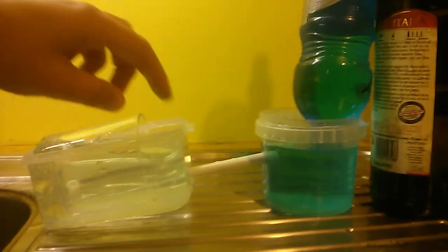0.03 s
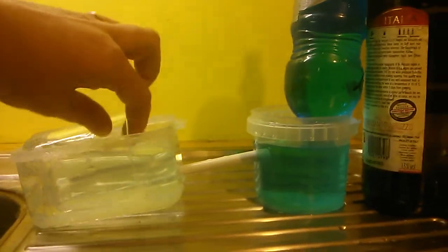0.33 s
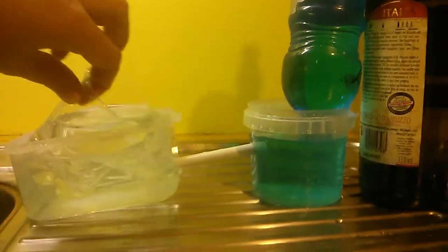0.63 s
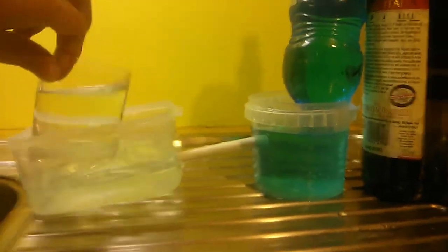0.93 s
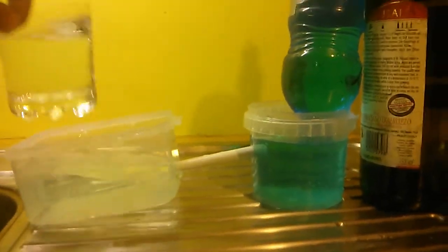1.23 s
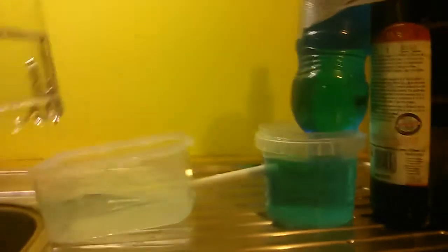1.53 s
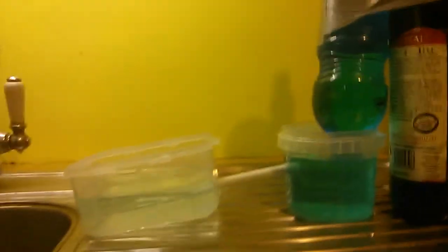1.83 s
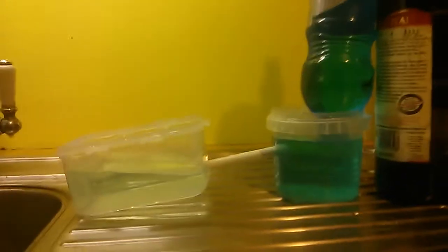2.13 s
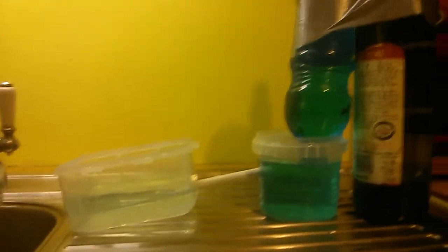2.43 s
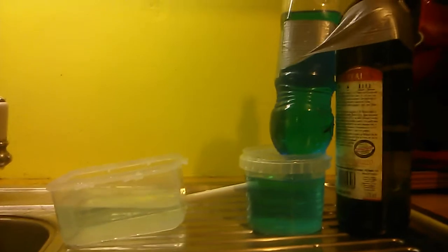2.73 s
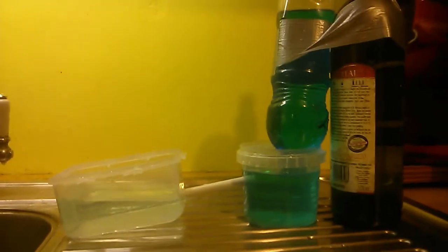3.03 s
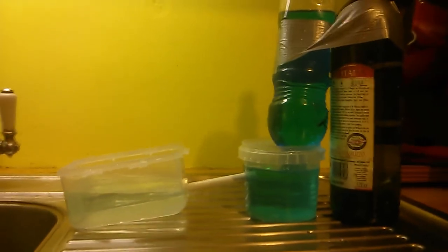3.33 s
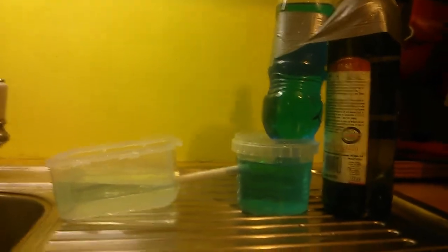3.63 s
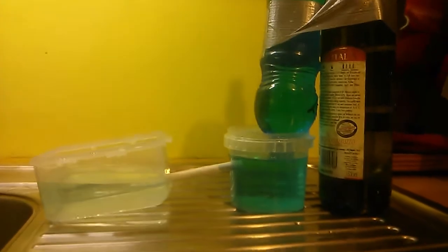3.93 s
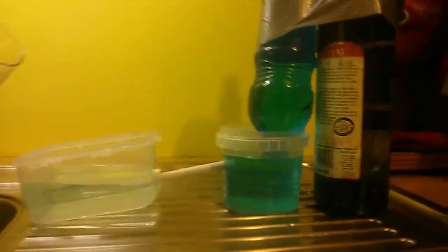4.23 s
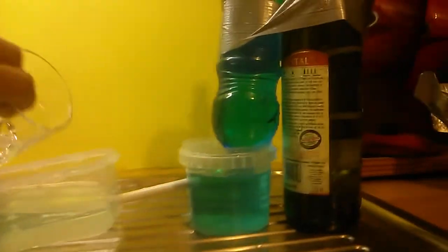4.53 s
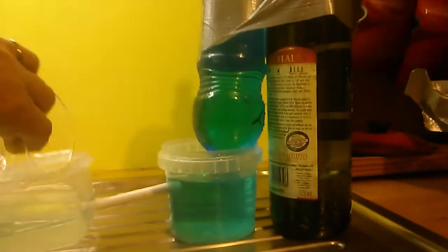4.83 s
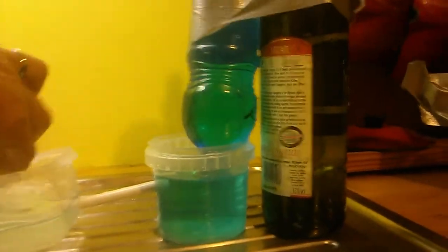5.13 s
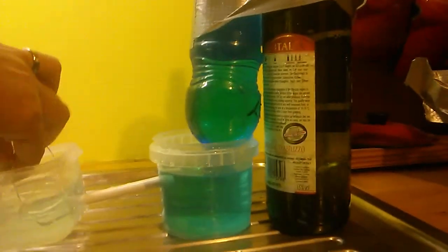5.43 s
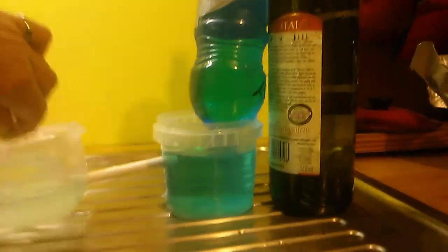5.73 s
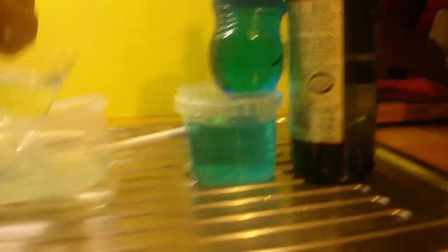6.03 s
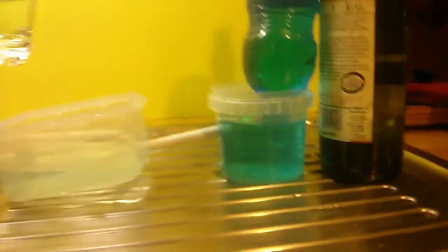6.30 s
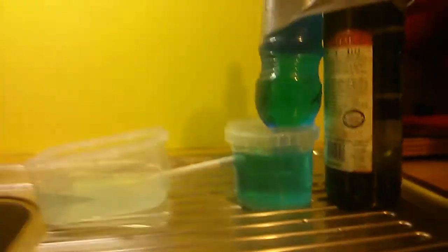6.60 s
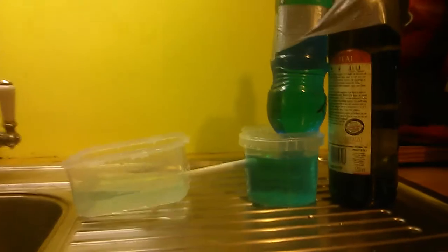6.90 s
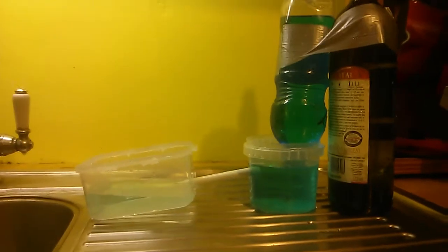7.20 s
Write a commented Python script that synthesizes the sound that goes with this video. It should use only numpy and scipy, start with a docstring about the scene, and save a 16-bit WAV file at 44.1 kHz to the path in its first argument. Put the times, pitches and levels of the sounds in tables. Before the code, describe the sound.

A cup knocks out of a plastic tub of water, is emptied splashing into a steel sink, then dipped again with gulps.

```python
"""A clear cup knocks against a plastic tub of water as it is lifted out; the steel draining board
booms under each knock. From 2.5 s it is emptied to one side: slaps on steel, three gushes of spray,
a gurgle, a trickle. Near 5 s it comes back, knocks against the tub, gulps as it is pushed under
(air pockets ring) and is lifted out again, dripping. Throughout, a small hard-walled kitchen
with a faint hum rings on."""
import sys
import numpy as np
from scipy import signal
from scipy.fft import rfft, irfft, next_fast_len
from scipy.io import wavfile
from scipy.ndimage import uniform_filter1d, map_coordinates

SR = 44100
rng = np.random.default_rng(int(sys.argv[2]) if len(sys.argv) > 2 else 0)


def to_wav(s):
    """Save 16-bit WAV."""
    ch = np.atleast_2d(s).T  # columns
    pcm = np.round(np.clip(ch, -1, 1) * 32767)  # PCM
    wavfile.write(sys.argv[1], SR, pcm.astype(np.int16))


N = 320166
TOP_HZ = 16000
T = np.arange(SR // 2) / SR  # time axis of one event, s


def amp(db):
    """Decibels to gain."""
    return 10 ** (np.asarray(db) / 20)


def unit(x):
    """x at rms 1."""
    return x / np.sqrt(np.mean(x ** 2) + 1e-20)


def crest(x):
    """x with its loudest 4 ms at rms 1."""
    return x / np.sqrt(uniform_filter1d(x ** 2, size=176).max() + 1e-20)


def fade(t, t60_s):
    """Exponential decay, 60 dB in t60_s."""
    return np.exp(-np.log(1000) * t / t60_s)


def punch(boost, t60_s):
    """Gain that lifts a contact's first instant above its ring."""
    return 1 + boost * fade(T, t60_s)


def along(points, hz):
    """Interpolate (Hz, value) points on a log axis."""
    knots_hz, values = np.transpose(points)
    return np.interp(np.log(hz + 1), np.log(knots_hz + 1), values)


def curve(points):
    """Gain per sample from (s, dB) points, silent outside them."""
    times_s, db = np.transpose(points)
    return amp(np.interp(np.arange(N) / SR, times_s, db, left=-120, right=-120))


def wobble(knots_per_s):
    """Smooth random curve."""
    knots = rng.standard_normal(int(N * knots_per_s / SR) + 4)
    return map_coordinates(knots, [np.arange(N) * knots_per_s / SR])


def filtered(x, response):
    """x times a gain over frequency."""
    size = next_fast_len(len(x) + 8192)
    return irfft(rfft(x, size) * response(np.fft.rfftfreq(size, 1 / SR)), size)[:len(x)]


def noise(response, size):
    """Coloured noise at rms 1."""
    return unit(filtered(rng.standard_normal(size), response))


def hump(centre_hz, octaves):
    """Response of a resonance with soft skirts."""
    return lambda hz: (1 + (np.log2((hz + 1) / centre_hz) / octaves) ** 2 / 4) ** -3.5


def burst(centre_hz, octaves, t60_s, swell_s):
    """Short spit of noise round one pitch."""
    band = noise(hump(centre_hz, octaves), len(T))
    return crest(band * fade(T, t60_s) * (1 - np.exp(-T / swell_s)))


def add(track, start_s, sound):
    """Mix a sound into the track."""
    i = max(0, round(start_s * SR))
    track[i:i + len(sound)] += sound[:max(0, N - i)]


def kitchen_tail():
    """Diffuse impulse response; each frequency dies at its own speed."""
    # Each row: frequency in Hz, t60 in seconds.
    decay = [(100, 0.43), (500, 0.5), (2000, 0.42), (7000, 0.47), (15000, 0.45)]
    hz, t, spectra = signal.stft(rng.standard_normal(SR), SR, nperseg=256)
    tail = signal.istft(spectra * fade(t, along(decay, hz)[:, None]), SR, nperseg=256)[1]
    tail *= 1 - np.exp(-np.arange(len(tail)) / SR / 0.0084)
    return tail / np.linalg.norm(tail)


def room(x):
    """x as the kitchen returns it."""
    return signal.fftconvolve(x, kitchen_tail())[:N]


def wash(click, colour):
    """A click radiates differently each way, so its echo keeps only its energy and broad colour."""
    echo = filtered(kitchen_tail(), colour)
    return echo * np.linalg.norm(click) / np.linalg.norm(echo)


def background():
    """Still air, a faint wavering hum and a thin hiss that comes and goes."""
    # Each row: frequency in Hz, relative spectral density in dB.
    air_spectrum = [(25, -17), (60, -10), (110, -6), (220, -1), (330, -3.5), (510, -11.5), (650, -2.5),
                    (850, -19), (1020, -13.5), (1300, -21.5), (2000, -19.5), (3200, -40.5), (7500, -37),
                    (16000, -48.5)]
    hiss_spectrum = [(3000, -9), (5000, -9), (7800, -4), (11000, -9), (14000, -4), (16000, -5.5)]
    # Each row: centre in Hz, half-width in Hz, relative level in dB.
    hum_bands = [(118.4, 1.3, -68), (219.4, 11, -63), (385, 74, -63.5), (702, 35, -68), (900, 45, -66.5),
                 (1325, 77, -71)]
    # Each row: time in seconds, level in dB.
    hiss_levels = [(0, -68), (1.2, -74.5), (1.7, -70), (2.4, -69), (3.9, -65), (4.7, -67), (5.6, -63.5),
                   (6.2, -73), (7.26, -73.5)]
    hum = sum(amp(db) * noise(lambda f: 1 / (1 + ((f - hz) / width_hz) ** 2), N)
              for hz, width_hz, db in hum_bands)
    hiss = curve(hiss_levels) * noise(lambda hz: amp(along(hiss_spectrum, hz)), N)
    air = noise(lambda hz: amp(along(air_spectrum, hz)), N)
    return amp(-55.5) * air + amp(-1) * hum + hiss


def hisses():
    """Brief soft hisses, heard mostly through the room."""
    # Each row: start in seconds, peak in dB, t60 in seconds.
    puffs = [(0, -51, 0.2), (2.251, -62.5, 0.099), (2.459, -51.5, 0.099), (3.519, -57.5, 1),
             (4.822, -49, 0.22), (5.078, -47, 0.33), (6.647, -49, 0.042), (7.11, -54, 0.11),
             (7.214, -52.5, 0.093)]
    centre_hz, octaves = 8240, 0.52
    out = np.zeros(N)
    for start_s, db, t60_s in puffs:
        puff = amp(db) * burst(centre_hz, octaves, t60_s, swell_s=0.0012)
        add(out, start_s, puff)
        add(out, start_s, amp(1.5) * wash(puff, hump(centre_hz, octaves)))
    return out


def clinks():
    """A light touch on something hard rings with two narrow partials."""
    # Each row: start in seconds, peak in dB, lower partial in Hz.
    touches = [(1.990, -60, 3280), (7.219, -52, 3730)]
    out = np.zeros(N)
    for start_s, db, hz in touches:
        for ratio, partial_db in ((1, 0), (1.75, -5.5)):
            partial = burst(hz * ratio, octaves=0.081, t60_s=0.065, swell_s=0.001)
            add(out, start_s, amp(db + partial_db) * partial)
    return out + amp(-2) * room(out)


def bumps():
    """Soft, dull contacts, single or in loose runs of handling."""
    # Each row: start in seconds, relative peak in dB, centre in Hz.
    singles = [(0.691, -28, 98), (1.091, -30, 105), (1.15, -29.5, 104), (4.453, -41.5, 122),
               (4.865, -37, 140), (5.201, -34.5, 115), (5.426, -32.5, 120), (5.836, -32, 141),
               (6.272, -32.5, 245), (6.956, -36, 211)]
    # Each row: start in seconds, length in seconds, relative peak in dB, centre in Hz.
    handling = [(2.11, 0.14, -40.5, 218), (6.301, 0.33, -40.5, 268)]
    bumps_per_s = 16
    runs = [(start_s + (k + rng.random()) / bumps_per_s, db + 2 * rng.standard_normal(), hz)
            for start_s, length_s, db, hz in handling for k in range(round(length_s * bumps_per_s))]
    out = np.zeros(N)
    for start_s, db, hz in singles + runs:
        add(out, start_s, amp(db - 5.5) * burst(hz, octaves=0.316, t60_s=0.059, swell_s=0.017))
    return out + amp(-4.5) * room(out)


def basin(hz):
    """Gain of the steel sink's resonances."""
    # Each row: centre in Hz, width in Hz, gain in dB.
    resonances = [(650, 110, 5), (895, 50, -5), (1261, 313, -1), (1865, 140, -1.5), (2140, 320, -1)]
    return sum(amp(db) / (1 + (2 * (hz - centre_hz) / width_hz) ** 2)
               for centre_hz, width_hz, db in resonances)


def droplets(span_s, pitch_hz, colour, spread, decay_cycles, spike_db, count):
    """Shower of tiny bubbles, each a damped rising sine; rms 1 over the span."""
    start_s, end_s = span_s
    onsets_s = start_s + (end_s - start_s) * (np.arange(count) + 2 * rng.random(count)) / count
    hz = np.clip(pitch_hz(onsets_s) * np.exp(spread * rng.standard_normal(count)), 300, TOP_HZ)
    gains = amp(spike_db * np.minimum(rng.exponential(size=(count, 1)), 3))
    offsets = np.arange(1024)
    cycles = hz[:, None] * offsets / SR
    age = cycles / decay_cycles
    grains = gains * np.sin(2 * np.pi * cycles * (1 + 0.032 * age)) * np.exp(-age)
    positions = (onsets_s * SR).astype(int)[:, None] + offsets
    shower = np.bincount(positions.ravel(), grains.ravel(), N)[:N]
    return unit(filtered(shower, colour)) * np.sqrt((end_s - start_s) * SR / N)


def trickle():
    """Draining water stirs the basin with faint drips."""
    # Each row: time in seconds, relative level in dB.
    levels = [(3.3, -60), (3.6, -60.5), (4.0, -61), (4.45, -67), (4.62, -56), (4.9, -56), (5.3, -52),
              (5.9, -60.5), (7.26, -79)]
    span_s = levels[0][0], levels[-1][0]
    shower = droplets(span_s, lambda s: 1280, basin, spread=0.14, decay_cycles=7, spike_db=4, count=170)
    stir = curve(levels) * shower
    return amp(-2) * stir + amp(-6) * room(stir)


def drips():
    """Drops tick on steel and water; higher ticks are shorter, hard drops start with a crack."""
    # Each row: start in seconds, peak in dB, centre in Hz.
    drops = [(0.592, -53, 7500), (0.684, -48.5, 3970), (0.7622, -42.5, 6900), (0.799, -45.5, 7040),
             (0.855, -45, 6800), (0.900, -48, 7850), (0.935, -54, 11500), (1.535, -64, 2500),
             (1.866, -56.5, 11000), (1.893, -47.5, 1190), (2.25, -57.5, 2800), (3.167, -49.5, 3440),
             (3.295, -39, 7500), (3.371, -49, 6100), (3.709, -35, 7060), (3.752, -53, 2750),
             (3.937, -44, 1260), (4.013, -51, 1880), (5.219, -48.5, 7400), (5.285, -33, 7750),
             (6.279, -65, 3000), (6.646, -51.5, 2040), (7.25, -60, 3040)]
    octaves = 0.44
    hardest_db = max(db for _, db, _ in drops)
    out = np.zeros(N)
    for start_s, db, hz in drops:
        tick = amp(db) * burst(hz, octaves, t60_s=0.067 * (1000 / hz) ** 0.32, swell_s=0.0005)
        crack_db = db - 5.5 + 0.4 * (db - hardest_db)
        crack = amp(crack_db) * burst(centre_hz=12000, octaves=0.7, t60_s=0.005, swell_s=0.0008)
        add(out, start_s, tick + crack)
        add(out, start_s, amp(-4.5) * wash(tick, hump(hz, octaves)))
    return out


def bubbles():
    """Each air pocket closes with a wet smack, swells, rings and climbs in pitch on its way up."""
    # Each row: start in seconds, pitch in Hz, level in dB, t60 in seconds.
    pockets = [(0.763, 2370, -25.5, 0.025), (0.7625, 1355, -28.5, 0.023), (0.982, 1865, -37.5, 0.027),
               (1.084, 1810, -28.5, 0.015), (1.146, 1390, -25.5, 0.034), (1.146, 1930, -25.5, 0.026),
               (1.227, 2670, -44, 0.029), (2.783, 1240, -26, 0.078), (2.9, 1810, -23.5, 0.047),
               (2.961, 2060, -20, 0.012), (3.076, 1084, -33.5, 0.11), (3.264, 1740, -29, 0.053),
               (4.974, 942, -11.5, 0.056), (5.339, 2005, -32.5, 0.033), (5.356, 2480, -37, 0.023),
               (5.369, 2004, -40, 0.06), (5.369, 772, -19, 0.09), (5.388, 757, -20.5, 0.074),
               (5.388, 1974, -30.5, 0.075), (5.412, 780, -25, 0.093), (5.490, 824, -20, 0.046),
               (5.500, 1960, -18.5, 0.077), (5.692, 6300, -30, 0.023), (5.893, 3400, -45, 0.04),
               (6.647, 5170, -34.5, 0.032), (6.648, 10040, -35.5, 0.043)]
    octaves_per_t60 = 0.03
    out = np.zeros(N)
    for start_s, hz, db, t60_s in pockets:
        swell_s = 0.045 * t60_s
        rising_hz = hz * 2 ** (octaves_per_t60 * np.minimum(T / t60_s, 2))
        tone = np.sin(2 * np.pi * np.cumsum(rising_hz) / SR)
        envelope = fade(T, t60_s) * (1 - np.exp(-(T / swell_s) ** 2))
        smack = burst(hz, octaves=0.21, t60_s=0.017, swell_s=swell_s)
        add(out, start_s, amp(db) * tone * envelope + amp(db - 19.5) * smack)
    return out + amp(-19) * room(out)


def slaps():
    """Thrown water hits the steel in short bursts that fill the room."""
    # Each row: start in seconds, peak in dB, centre in Hz, width in octaves, t60 in seconds.
    impacts = [(2.477, -41.5, 2260, 0.45, 0.02), (2.479, -26, 4700, 0.63, 0.058),
               (2.5, -30, 7700, 0.5, 0.049), (2.654, -43.5, 11170, 0.6, 0.08),
               (2.677, -30.5, 7870, 0.3, 0.22), (2.846, -30, 7160, 0.31, 0.016),
               (2.9, -25, 8640, 0.19, 0.025), (2.9618, -19.5, 7100, 0.23, 0.013),
               (3.133, -36.5, 8300, 0.42, 0.042), (3.228, -36.5, 7400, 0.21, 0.035)]
    out = np.zeros(N)
    for start_s, db, hz, octaves, t60_s in impacts:
        slap = amp(db) * burst(hz, octaves, t60_s, swell_s=0.0082)
        add(out, start_s, slap)
        add(out, start_s, amp(-9.5) * wash(slap, hump(hz, octaves)))
    return out


def flow(t60_s, lag_share):
    """Strength of the pour: each gush rises, holds and dies away, late by a share of its rise."""
    # Each row: start in seconds, rise in seconds, hold in seconds, level in dB.
    gushes = [(2.618, 0.12, 0.051, -32.5), (2.853, 0.029, 0.1, -32), (3.196, 0.039, 0.031, -37.5)]
    power = np.zeros(N)
    for start_s, rise_s, hold_s, db in gushes:
        t = np.arange(N) / SR - start_s - lag_share * rise_s
        attack = np.clip(t / rise_s, 0, 1) ** 2
        release = fade(np.maximum(t - rise_s - hold_s, 0), t60_s)
        power += (amp(db) * attack * release) ** 2
    return np.sqrt(power)


def splash():
    """The stream breaks into clumps of fizzing spray; trapped air gurgles after each gush."""
    # Each row: frequency in Hz, relative spectral density in dB.
    spray_spectrum = [(1200, -43.5), (2000, -8), (3000, -17.5), (4600, -15), (6000, -8), (7400, -1.5),
                      (9500, -5), (12400, -16), (16000, -12)]
    # Each row: time in seconds, pitch of the trapped air in Hz.
    pocket_pitch = [(2.63, 2400), (2.74, 2000), (2.79, 1450), (2.86, 1380), (2.94, 1760), (3.02, 1280),
                    (3.11, 1070), (3.26, 1670), (3.42, 1800)]
    pour_s = (2.64, 3.5)
    colour = lambda hz: amp(along(spray_spectrum, hz))
    pocket_hz = lambda s: np.interp(s, *np.transpose(pocket_pitch))
    fizz = droplets(pour_s, lambda s: 7200, colour, spread=0.4, decay_cycles=3.5, spike_db=1, count=1650)
    plinks = droplets(pour_s, lambda s: 7500, hump(7500, 1),
                      spread=0.36, decay_cycles=8, spike_db=4.5, count=285)
    mist = amp(2.4 * wobble(70)) * noise(colour, N)
    spray = amp(-9 + 2 * wobble(60)) * fizz + amp(-12) * plinks + amp(-5.5) * mist
    gurgle = droplets(pour_s, pocket_hz, basin, spread=0.2194, decay_cycles=4.5, spike_db=3.5, count=520)
    out = flow(t60_s=0.35, lag_share=0) * spray
    out += amp(-11) * flow(t60_s=0.71, lag_share=0.38) * gurgle
    return out + amp(-8.5) * room(out)


def ring(band_hz, swell_s, rattle, rattle_t60_s):
    """Cup, tub and board modes in one band, struck at random strengths over a blur of denser ones."""
    # Each row: frequency in Hz, relative level in dB, t60 in seconds.
    all_modes = [(70.4, -15, 0.14), (106.5, -1.5, 0.16), (136.2, -10, 0.35), (164, -2.5, 0.043),
                 (294.4, -9, 0.162), (344.4, -1, 0.086), (393, -4, 0.16), (452, -1.5, 0.014),
                 (598.2, -8, 0.1), (741, 0.5, 0.069), (899, 5, 0.14), (1116, 8.5, 0.077), (1248, 2.5, 0.14),
                 (1392, 7.5, 0.1), (1757, 12, 0.059), (1941, 7, .045), (1890, 2, 0.025), (2116, 2, 0.17),
                 (2470, -0.5, 0.077), (3474, -4.5, 0.053), (4200, -10.5, 0.019)]
    modes = np.array([mode for mode in all_modes if band_hz[0] <= mode[0] < band_hz[1]])
    hz, db, t60_s = modes.T[:, :, None]
    gains = amp(db + 2 * rng.standard_normal(hz.shape))
    sines = np.sin(2 * np.pi * (hz * T + rng.random(hz.shape)))
    tones = np.sum(gains * fade(T, t60_s) * sines, axis=0)
    blur = noise(lambda f: sum(amp(level) * hump(centre, 0.13)(f) for centre, level, _ in modes), len(T))
    body = crest(tones) + rattle * blur * fade(T, rattle_t60_s)
    return crest(body * (1 - np.exp(-T / swell_s)) * punch(1.18, t60_s=0.021))


def knocks():
    """Cup against tub: the cup clacks at once; the heavy tub and the board swell a moment later."""
    # Each row: start in seconds, then relative clack, board boom and tick levels in dB.
    contacts = [(0.4496, -46, -41.5, -66), (0.4705, -40.5, -32, -59), (0.5097, -32, -28.5, -38),
                (0.6835, -33.5, -39, -62.5), (1.0818, -35.5, -37, -66), (1.0995, -39.5, -35, -81),
                (4.9740, -20.5, -26.5, -27.5), (5.3404, -49, -41.5, -50.5), (5.4655, -25, -24.5, -44),
                (5.4935, -32.5, -27.5, -59.5), (5.6386, -29.5, -30.5, -45.5), (5.7518, -27, -28, -33),
                (5.7776, -18, -21.5, -22)]
    # Hard edge of a contact. Each row: frequency in Hz, relative spectral density in dB.
    tick_spectrum = [(2200, -10), (3300, -3), (4500, -4), (5500, -6), (7000, 3.5), (9000, -4), (12000, -16),
                     (16000, -16.5)]
    edge = lambda hz: amp(along(tick_spectrum, hz))
    cushion = signal.butter(6, 2500, fs=SR, output="sos")
    out = np.zeros(N)
    for start_s, clack_db, boom_db, tick_db in contacts:
        wall_db = clack_db + 0.36 * (tick_db - clack_db) - 1.5  # harder contact, more cup wall
        hollow_db = boom_db + 0.25 * (wall_db - boom_db) - 4  # board and wall drive the tub's hollow
        board = ring(band_hz=(0, 250), swell_s=0.0059, rattle=0.53, rattle_t60_s=0.22)
        hollow = ring(band_hz=(250, 600), swell_s=0.0056, rattle=0.66, rattle_t60_s=0.13)
        wall = ring(band_hz=(600, 1200), swell_s=0.0006, rattle=0.81, rattle_t60_s=0.079)
        rim = ring(band_hz=(1200, 6000), swell_s=0.0006, rattle=0.97, rattle_t60_s=0.12)
        if tick_db <= clack_db - 23:  # cushioned by water: high modes stay quiet
            rim = signal.sosfilt(cushion, rim)
        hit = amp(boom_db) * board + amp(hollow_db) * hollow
        hit += amp(wall_db) * wall + amp(clack_db - 2.5) * rim
        tick_envelope = fade(T, 0.12) * punch(1.55, t60_s=0.015)
        tick = amp(tick_db - 1.5) * crest(noise(edge, len(T)) * tick_envelope)
        add(out, start_s, hit + tick)
        add(out, start_s, amp(-11.5) * room(hit))
        add(out, start_s, amp(-10) * wash(tick, edge))
    return out


def scene():
    """Water, contacts and background in one channel."""
    water = bubbles() + slaps() + splash() + trickle() + drips() + hisses()
    return (water + knocks() + clinks() + bumps() + background())[None]


def record(dry):
    """Brick-wall low-pass at TOP_HZ."""
    return np.array([filtered(x, lambda hz: hz < TOP_HZ) for x in dry])


dry = scene()
out = record(dry)
to_wav(out)
```